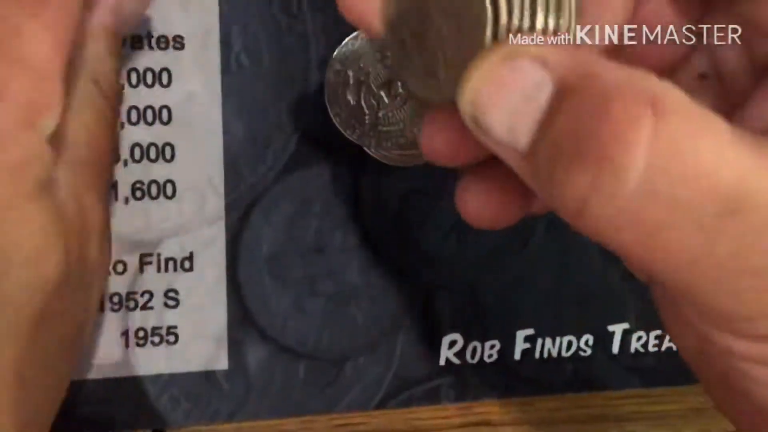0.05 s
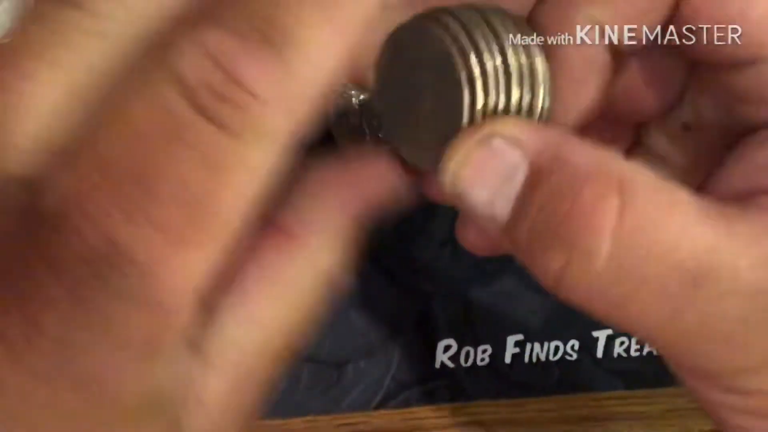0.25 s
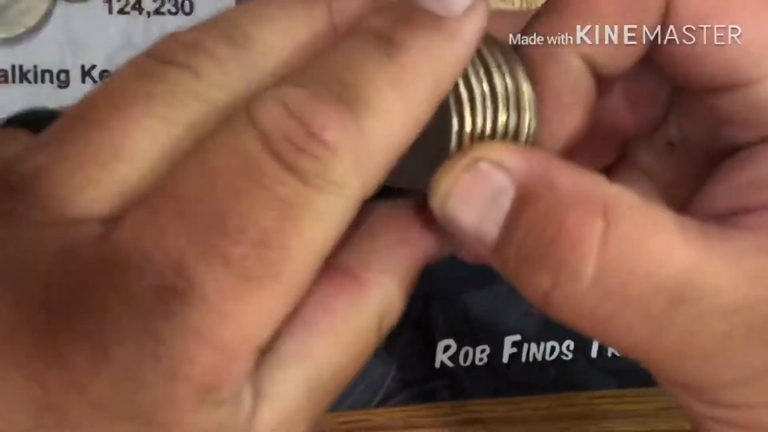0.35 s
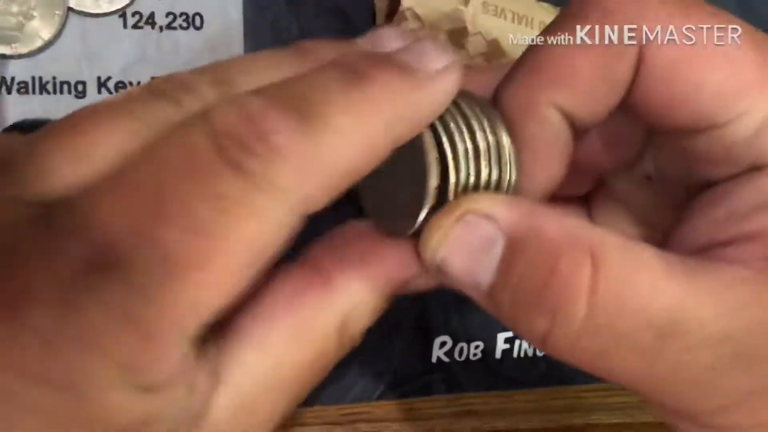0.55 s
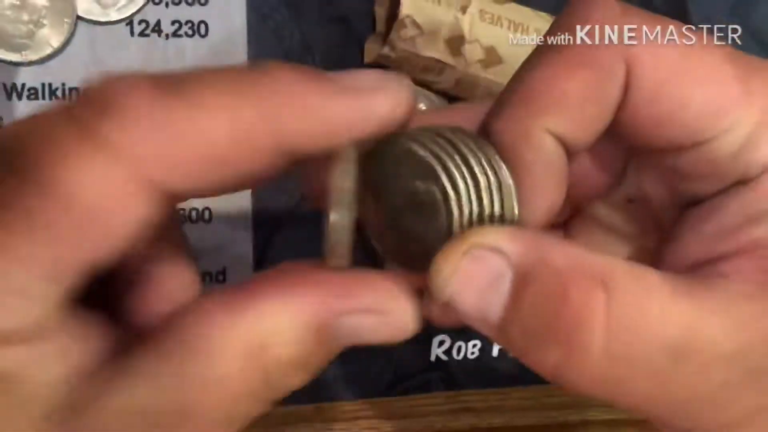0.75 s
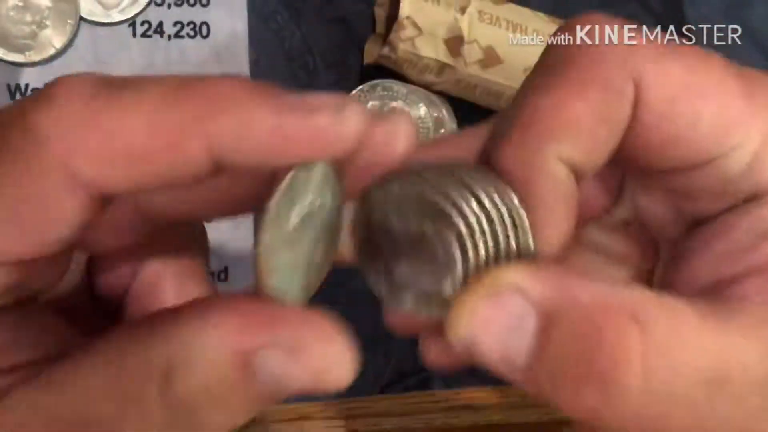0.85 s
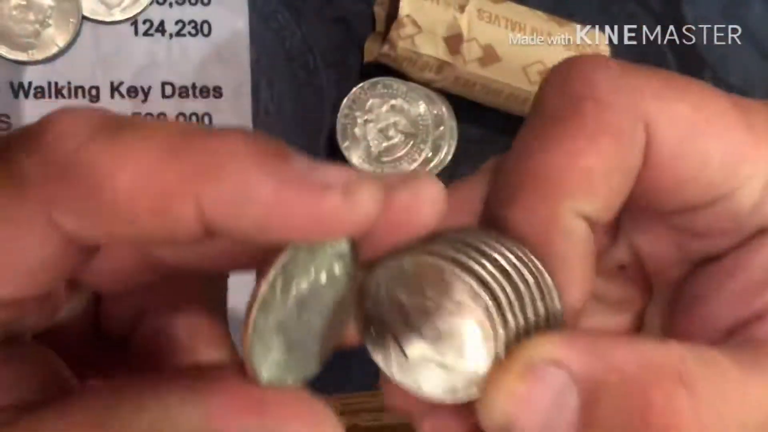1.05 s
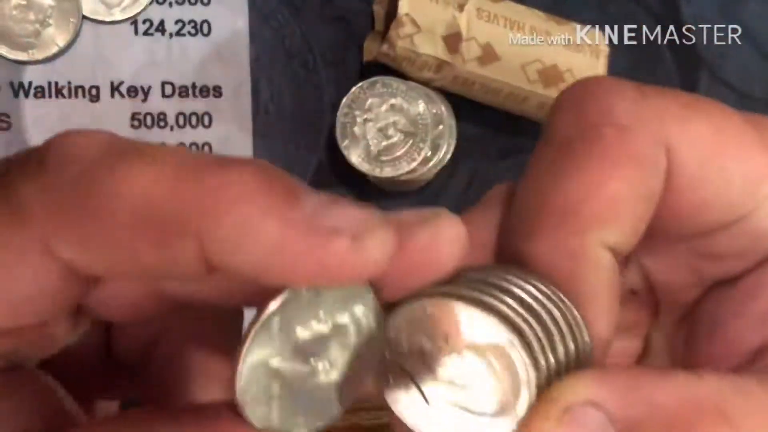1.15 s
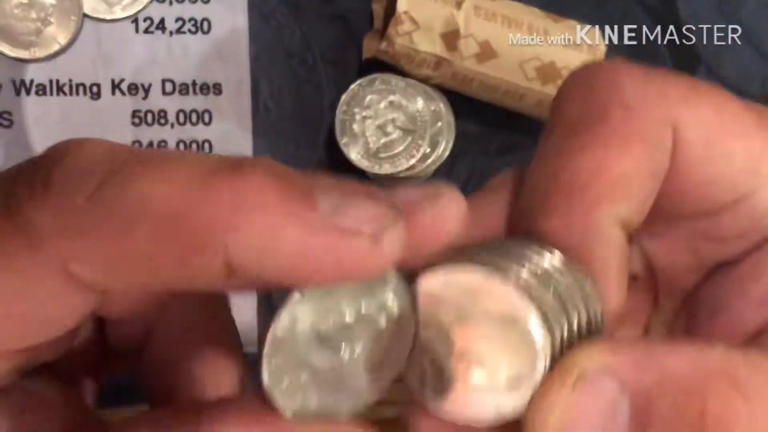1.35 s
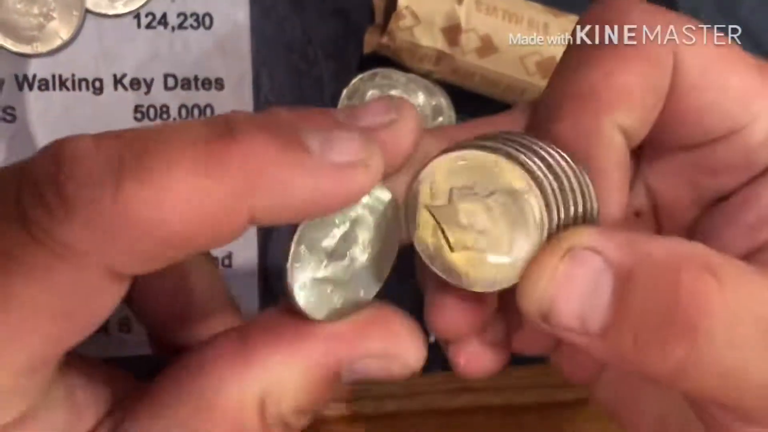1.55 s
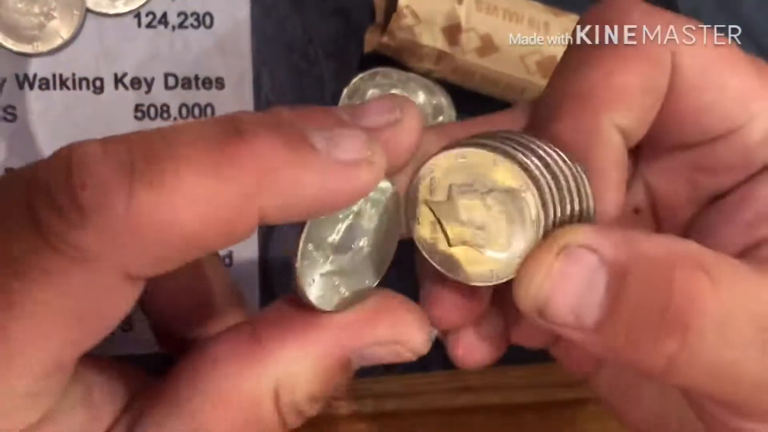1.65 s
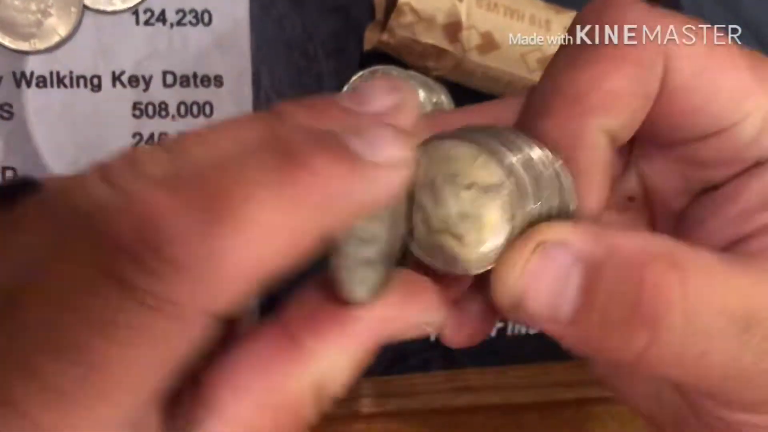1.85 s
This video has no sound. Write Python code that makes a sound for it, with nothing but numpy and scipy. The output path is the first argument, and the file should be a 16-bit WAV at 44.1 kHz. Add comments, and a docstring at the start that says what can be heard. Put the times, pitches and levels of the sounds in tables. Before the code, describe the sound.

Big coins clinking and rattling against a stack in the hands, then near quiet.

```python
"""Large silver coins, handled over a mat close to the microphone in a small quiet room.
A loose coin clinks against a stack, scrapes and rattles along the reeded rims and rings in bright,
beating modes until the fingers close on it. Held coins and fingers add dull knocks.
A few faint ticks follow over the room's low hum and a thin whine.
The loudest ringing overloads the microphone."""
import sys
import numpy as np
from scipy import signal
from scipy.fft import rfft, irfft
from scipy.io import wavfile
from scipy.ndimage import uniform_filter1d, minimum_filter1d

SR = 44100
rng = np.random.default_rng(int(sys.argv[2]) if len(sys.argv) > 2 else 0)


def generate_wav(sig):
    """Save sig (samples, or channels by samples) to the path in sys.argv[1] as 16-bit PCM at SR."""
    pcm = np.round(np.clip(np.atleast_2d(sig).T, -1, 1) * 32767).astype(np.int16)
    wavfile.write(sys.argv[1], SR, pcm)


N = 83790


def undb(db):
    """Decibels to gain."""
    return 10 ** (np.asarray(db) / 20)


def curve(rows, column=1):
    """One column of a table, joined by straight lines in time."""
    rows = np.array(rows)
    return np.interp(np.arange(N) / SR, rows[:, 0], rows[:, column])


def colour(x, spectrum):
    """Equalise a steady signal through (Hz, dB) points and scale it to rms 1."""
    hz, db = np.array(spectrum).T
    bin_hz = np.maximum(np.arange(N // 2 + 1) * SR / N, 1)
    gain = undb(np.interp(np.log(bin_hz), np.log(hz), db))
    shaped = irfft(rfft(x) * gain, N)
    return shaped / np.sqrt(np.mean(shaped ** 2))


def bursts(starts, levels_db, spectrum, decay_s):
    """A burst of coloured noise at each start: instant attack, exponential decay."""
    t = np.arange(N) / SR
    power = sum(undb(db) ** 2 * (t >= s) * np.exp(-2 * np.abs(t - s) / decay_s)
                for s, db in zip(starts, levels_db))
    return 2 * np.sqrt(power) * colour(rng.standard_normal(N), spectrum)


def room(x, wet_db, delay_s=0.0025, t60_s=0.28):
    """The walls add a weak, short tail to the direct sound."""
    t = np.arange(N) / SR
    tail = rng.standard_normal(N) * (t > delay_s) * np.exp(-np.log(1000) * t / t60_s)
    return x + undb(wet_db) * signal.fftconvolve(x, tail / np.linalg.norm(tail))[:N]


def room_tone():
    """Low room noise, a few faint hum tones and a thin whine that fades in near the end."""
    # Hum tones. Each row: frequency in Hz, rms level in dB.
    hum_tones = [(119, -61), (204.6, -68.5), (565, -67.5), (603, -69), (839.8, -66.5)]
    # The whine's fade. Each row: time in seconds, level in dB.
    whine_fade = [(1.35, -110), (1.45, -80.5), (1.62, -71.5), (1.9, -73.5)]
    # Spectra of the whine and the room noise. Each row: frequency in Hz, relative level in dB.
    whine_spectrum = [(7500, -59.5), (8450, -20), (8680, -1.5), (8950, -20), (9800, -34.5), (10650, -24),
                      (10870, -7), (11100, -26), (12500, -58)]
    air_spectrum = [(20, -30.5), (45, -10), (65, -5.5), (97, -11), (125, -0.5), (170, 0.5), (270, 1),
                    (335, -6.5), (440, -11.5), (550, -5), (720, -12.5), (850, -13), (1050, -18),
                    (1900, -27), (2900, -28.5), (4400, -27), (7000, -35.5), (9000, -39.5), (13000, -41),
                    (15500, -47.5)]
    t = np.arange(N) / SR
    hum = sum(np.sqrt(2) * undb(db) * np.sin(2 * np.pi * (hz * t + rng.random())) for hz, db in hum_tones)
    whine = undb(curve(whine_fade)) * colour(rng.standard_normal(N), whine_spectrum)
    air = undb(-47.5) * colour(rng.standard_normal(N), air_spectrum)
    return hum + whine + air


def knocks(thud_lag_s=0.0038):
    """Held coins and fingers knock dully: a short tap, then the soft low thud of the hand."""
    # Muffled contacts. Each row: start in seconds, tap level in dB, thud level in dB.
    hits = [(.055, -37, -35.5), (0.143, -39, -42), (.2075, -38.5, -54), (.4645, -36, -45.5),
            (.48, -54, -49.5), (.4945, -41.5, -55), (.506, -38, -53), (.5435, -38, -65),
            (1.7065, -57.5, -48)]
    # Spectra of tap and thud. Each row: frequency in Hz, relative level in dB.
    tap_spectrum = [(200, -13.5), (520, 3), (620, -9), (750, 10), (950, -5.5), (1400, 6), (1900, -3.5),
                    (2500, -16.5), (3300, -4.5), (6000, -30.5), (12000, -50.5)]
    thud_spectrum = [(60, -33), (130, -6.5), (190, 2.5), (260, 2.5), (340, -10.5), (600, -21.5),
                     (2000, -33.5), (8000, -74.5)]
    starts, tap_db, thud_db = np.array(hits).T
    taps = bursts(starts, tap_db, tap_spectrum, decay_s=0.0029)
    thuds = bursts(starts + thud_lag_s, thud_db, thud_spectrum, decay_s=0.018)
    return taps + thuds


def rim_scrape(ridges_per_s=700, spread_db=13.5):
    """Reeded rims slide over each other; tiny ridge impacts excite the damped coins of the stack."""
    # The slide's envelope. Each row: time in seconds, level in dB.
    slide = [(.06, -110), (.09, -37), (.11, -49), (.18, -55.5), (.23, -39), (.28, -48.5), (.385, -55.5),
             (.41, -23.5), (.47, -21), (.52, -24), (.57, -25), (.6, -31.5), (.625, -67.5), (.68, -110)]
    # Spectrum of the rasp. Each row: frequency in Hz, relative level in dB.
    rasp_spectrum = [(1000, -37), (3300, -41.5), (5000, -35), (6600, -17.5), (7000, -9), (7280, 10),
                     (7550, -13.5), (8000, -15.5), (9500, -24.5), (11300, -12.5), (11800, -8.5),
                     (12200, -10.5), (12700, -11), (13100, -22), (14000, -43), (15600, -30)]
    impacts = rng.random(N) < ridges_per_s / SR
    ridges = impacts * rng.standard_normal(N) * undb(spread_db * rng.random(N))
    return colour(ridges, rasp_spectrum) * undb(curve(slide))


def ring(modes, starts, levels_db, t60_s, jolt_rad=0.97, scatter_db=2.9, rise_s=0.00044):
    """Each contact feeds the modes unevenly and jolts their phase; the fingers drain the energy."""
    t = np.arange(N) / SR
    hz, mode_db = np.array(modes).T[:, :, None]
    loss = np.cumsum(np.log(1000) / t60_s) / SR  # nepers
    power, phase_steps = np.zeros((2, len(modes), N))
    for start, db in zip(starts, levels_db):
        scatter, jolt = rng.standard_normal((2, len(modes), 1))
        i = int(start * SR)
        j = np.searchsorted(loss, loss[i] + 10)  # rung out by here
        push = np.exp(-t[:j - i] / rise_s)
        energy = undb(db + mode_db + scatter_db * scatter) ** 2
        # A mode that already rings loudly is harder to jolt.
        share = energy / (energy + power[:, i, None])
        phase_steps[:, i:j] += jolt_rad * jolt * np.sqrt(share) * (push / push.sum())
        envelope = (1 - push) * np.exp(loss[i] - loss[i:j])
        power[:, i:j] += energy * envelope ** 2
    phase = 2 * np.pi * (hz * t + rng.random(hz.shape)) + np.cumsum(phase_steps, axis=1)
    return np.sum(np.sqrt(power) * np.sin(phase), axis=0)


def coin_clinks():
    """Metal meets metal: a click, a clack from the stack and two groups of close, beating modes."""
    # Coin contacts. Each row: start in seconds, then click, low ring, high ring and clack levels in dB.
    contacts = [(0.058, -47, -48.5, -56, -72), (0.0879, -26, -35.5, -35.5, -49),
                (0.0949, -22, -27, -34, -56), (0.1083, -25, -50, -28, -69),
                (0.1501, -42.5, -36, -43.5, -67), (0.17, -51, -38, -72, -53.5),
                (0.1895, -42.5, -53, -33.5, -66.5), (0.1994, -15.5, -30, -14, -38.5),
                (0.2124, -30.5, -30.5, -22.5, -49.5), (0.216, -15, -40.5, -21.5, -45),
                (.219, -26, -41, -36.5, -54), (0.2484, -41, -57.5, -36.5, -43.5),
                (.274, -60, -47, -23.5, -70.5), (0.3329, -54, -53, -68, -46), (0.356, -58.5, -47, -39, -50),
                (0.3728, -66.5, -54.5, -52.5, -45), (0.3917, -54.5, -31.5, -31.5, -43.5),
                (0.403, -27, -25.5, -17, -48.5), (0.4118, -29.5, -12.5, -7, -52.5),
                (.425, -18.5, -27.5, -12, -35), (0.4393, -46, -24, -17, -60.5),
                (.4442, -46, -25.5, -9, -57), (.4517, -39, -21.5, -7.5, -47.5),
                (0.4636, -29.5, -6.5, -11, -25.5), (0.473, -41.5, -15.5, -30.5, -54.5),
                (0.481, -45.5, -9, -33, -67.5), (0.494, -30.5, -37, 2, -28.5),
                (0.505, -25.5, -29, -5, -23.5), (0.521, -39, -20, -2, -52.5), (0.5372, -34.5, -31, -3, -28),
                (0.548, -25, -45, -6, -47.5), (0.5552, -23.5, -31, -31, -60.5),
                (0.5661, -40.5, -33.5, -14.5, -49.5), (.5742, -33.5, -28.5, -31, -39.5),
                (.5842, -40.5, -29, -29, -56), (.5874, -47.5, -37, -19, -46),
                (0.5989, -32, -46.5, -35, -43), (1.2672, -50.5, -82.5, -81, -43.5),
                (1.5111, -57.5, -81, -77.5, -45.5)]
    # Finger damping. Each row: time, then T60 of the low and of the high modes, all in seconds.
    grip = [(.1, 0.17, 0.24), (.19, 0.3, 0.15), (.203, 0.36, 0.064), (.225, 0.12, 0.3), (.29, 0.87, 0.22),
            (.33, 1, .12), (.37, .6, .4), (.42, 0.093, 0.19), (.5, .1, 0.28), (.55, 0.16, 0.2),
            (.595, 0.29, 0.099), (.61, 0.024, 0.02), (.65, 0.098, 0.081)]
    # The coins' bending modes and the short-lived modes of the tightly held stack.
    # Each row: frequency in Hz, relative level in dB.
    low_modes = [(7097, -7), (7220, -2), (7292, -7), (7385, -17)]
    high_modes = [(12030, -1), (12443, -6.5), (12062, -19), (12468, -22), (15560, -43)]
    stack_modes = [(3350, -25), (4270, -23.5), (6370, -26.5), (9060, -10.5), (9520, -15.5), (9920, -18.5),
                   (10800, -15.5), (14900, -20.5), (15480, -18)]
    # Spectra of click and clack. Each row: frequency in Hz, relative level in dB.
    click_spectrum = [(1500, -46), (4000, -26), (6200, -14.5), (7300, 0.5), (8200, -1), (9500, 2),
                      (11000, -0.5), (12400, 13.5), (13300, 1.5), (14300, -15), (15500, -11.5)]
    clack_spectrum = [(200, -22), (520, -4.5), (750, 10), (1000, -5), (1700, -4), (2400, -10.5), (3400, 3),
                      (4200, -0.5), (5200, -0.5), (7000, -3), (11000, -17), (15500, -21)]
    starts, click_db, low_db, high_db, clack_db = np.array(contacts).T
    low_ring = ring(low_modes, starts, low_db, t60_s=curve(grip, column=1))
    high_ring = ring(high_modes, starts, high_db, t60_s=curve(grip, column=2))
    stack_ring = ring(stack_modes, starts, click_db, t60_s=np.full(N, 0.025))
    clacks = bursts(starts, clack_db, clack_spectrum, decay_s=0.0013)
    # The ringing is cupped in the hands, so it reaches the walls less than the clicks do.
    ringing = room(low_ring + high_ring, wet_db=-29.5)
    clicks = bursts(starts, click_db, click_spectrum, decay_s=0.0011)
    return ringing + room(stack_ring + clacks + clicks, wet_db=-16)


def scene():
    """Clinks, scrape and knocks over the room tone, in mono."""
    return (coin_clinks() + room(rim_scrape() + knocks(), wet_db=-23.5) + room_tone())[None]


def record(dry, threshold=1.12, smooth_s=0.0032, ceiling=0.92, top_hz=15700):
    """A fast limiter holds the loudest ringing, the remaining peaks clip slightly, and the top is cut."""
    span = int(smooth_s * SR)
    gain = threshold / np.maximum(np.abs(dry), threshold)
    limited = dry * uniform_filter1d(minimum_filter1d(gain, span), span)
    skewed = limited + 0.008 * limited ** 2  # a trace of lopsided distortion
    lowpass = signal.ellip(12, 0.2, 80, top_hz, fs=SR, output="sos")
    return signal.sosfilt(lowpass, np.clip(skewed, -ceiling, ceiling))


dry = scene()
out = record(dry)
generate_wav(out)
```